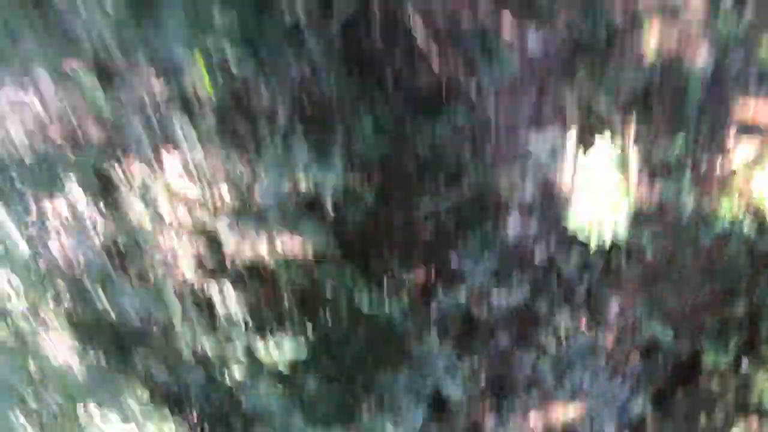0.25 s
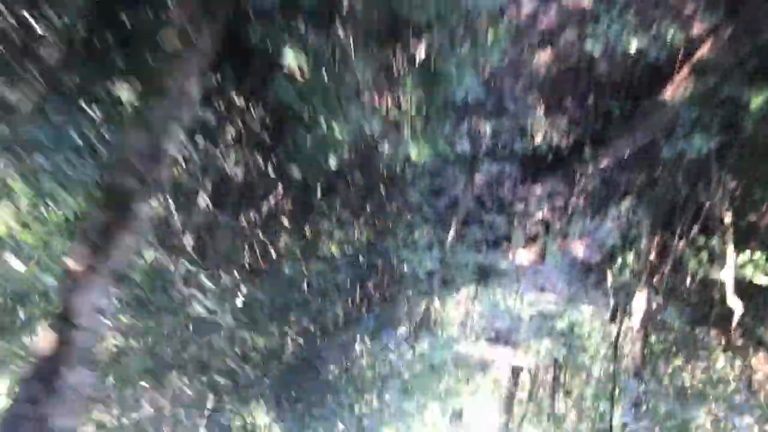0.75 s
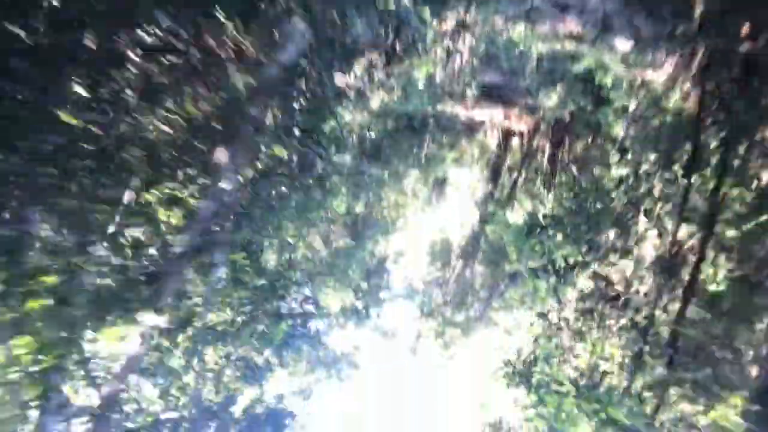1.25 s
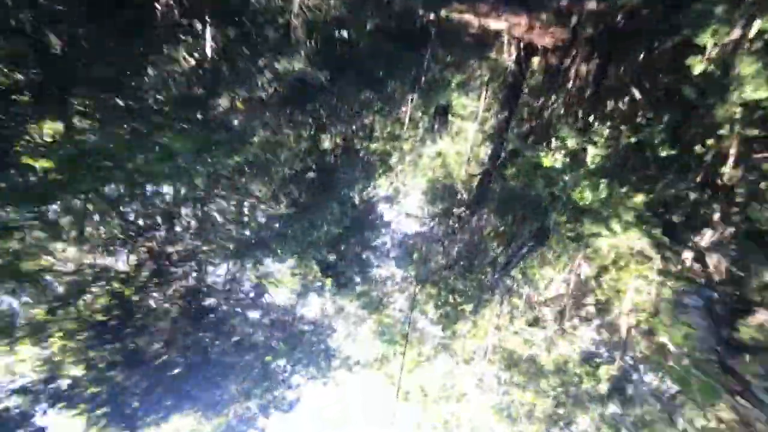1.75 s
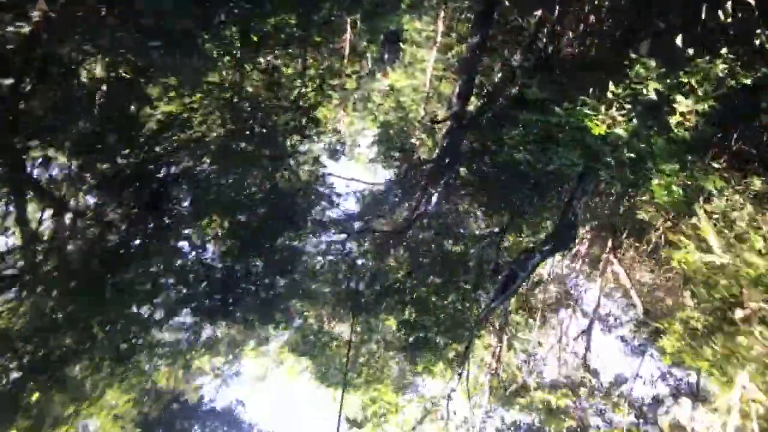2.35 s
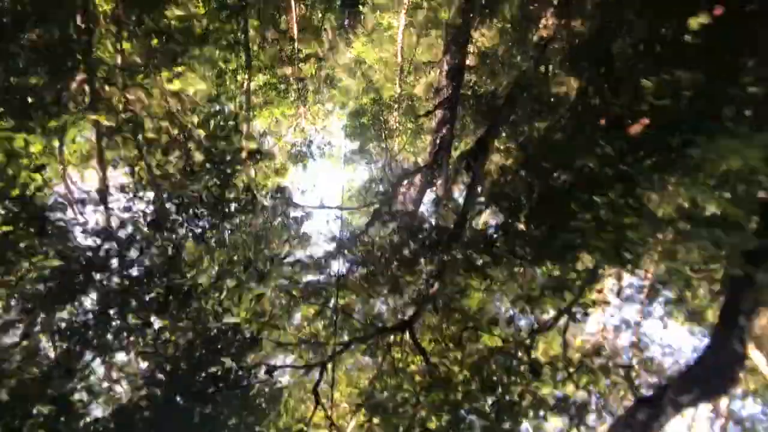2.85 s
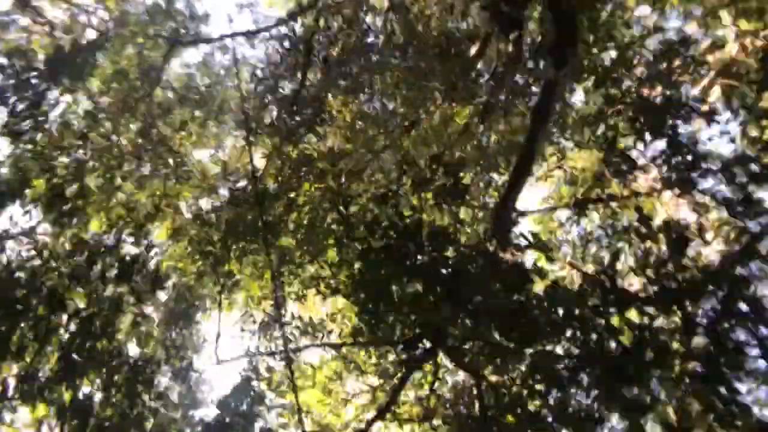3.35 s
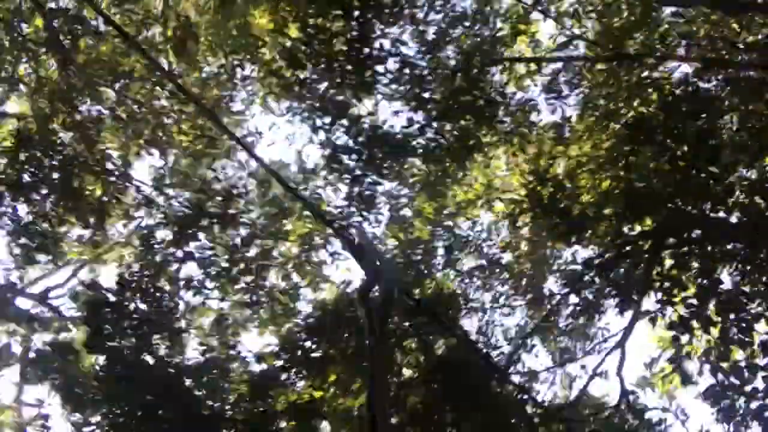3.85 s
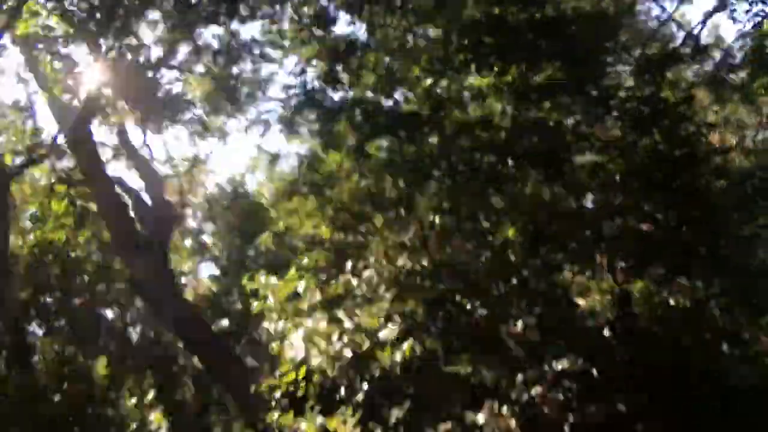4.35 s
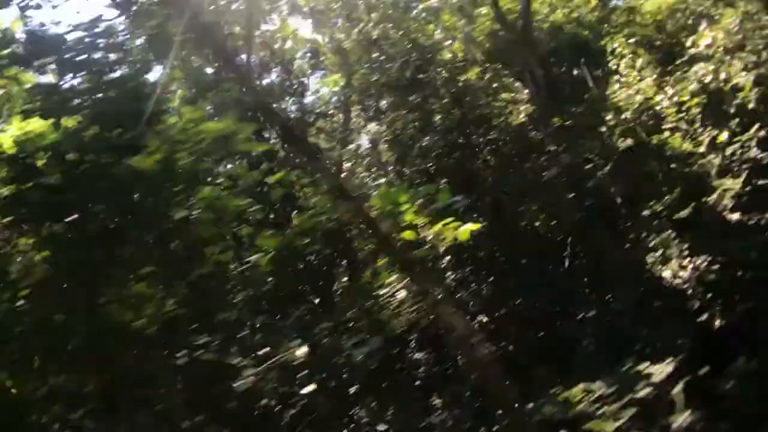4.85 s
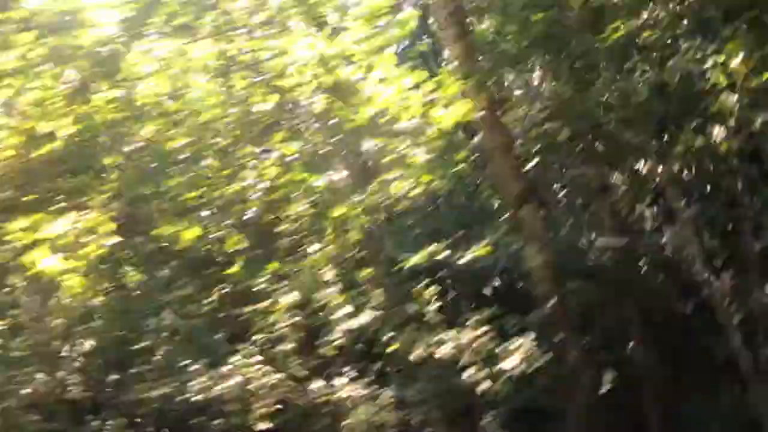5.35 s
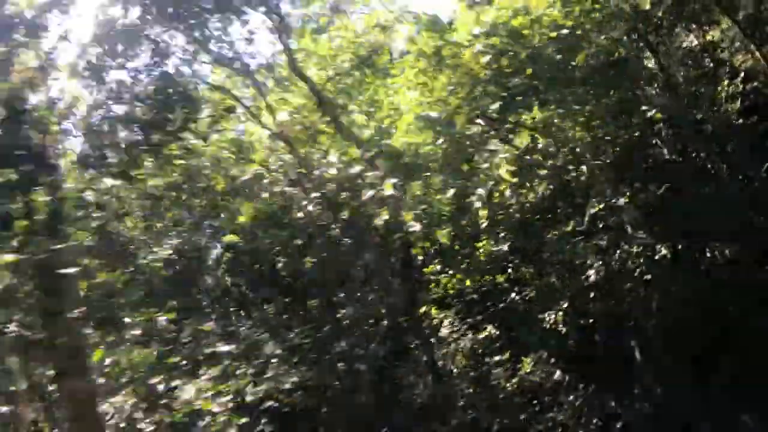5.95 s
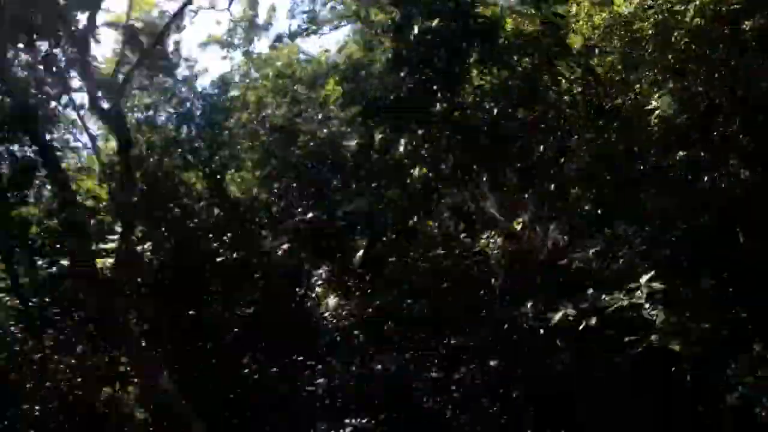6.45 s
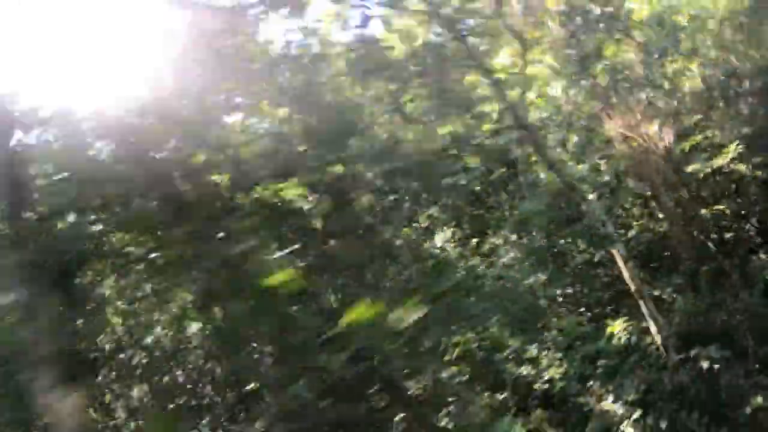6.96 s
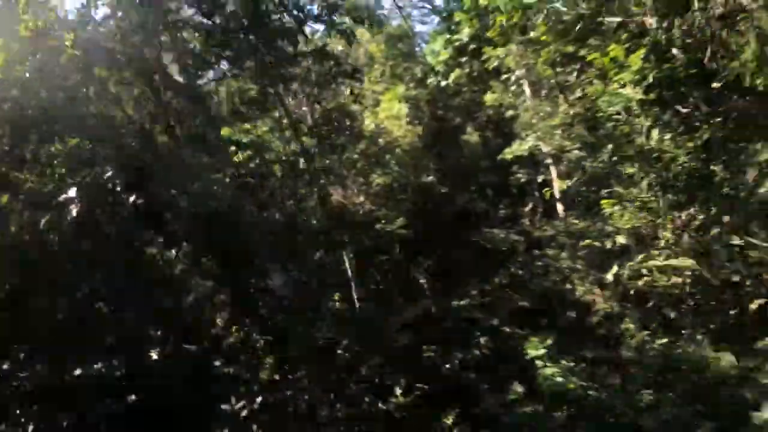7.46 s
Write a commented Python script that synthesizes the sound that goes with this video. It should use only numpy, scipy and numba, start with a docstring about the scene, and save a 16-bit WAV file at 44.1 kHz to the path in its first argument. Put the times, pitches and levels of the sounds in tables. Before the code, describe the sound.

A trolley races down a cable in a forest, bright sizzling hiss and fluttering metallic whine, after a burst of buffeting wind.

```python
"""A zipline trolley runs along a steel cable through a forest, a phone held just below it and turning about.
Wind buffets the single microphone hardest in the first second: low noise rumbles, flutters and flaps.
From the start the wheels also cross the cable's strands, a wavering stack of tones whose pitch sinks later on,
and their rough rolling hisses as noise through the resonances of cable and frame. Higher tones swell and fade
from 0.75 s, often several at once; near 4.4 s the phone swings aside, dulling the hiss near 7.5 kHz."""
import sys
import numpy as np
from scipy import signal
from scipy.io import wavfile
from scipy.ndimage import uniform_filter1d
from numba import njit

SR = 44100
rng = np.random.default_rng(int(sys.argv[2]) if len(sys.argv) > 2 else 0)


def unload_audio(sound):
    """Save the sound as a 16-bit wav file, at the path given as the first command line argument."""
    columns = np.transpose(np.atleast_2d(sound))
    # keep every value between -1 and 1, then stretch to whole-number steps
    steps = np.round(np.clip(columns, -1, 1) * 32767)
    wavfile.write(sys.argv[1], SR, steps.astype(np.int16))


N = 340011  # length in samples

# Wind on the microphone. Each row: time in seconds, rumble level in dB, flutter level in dB above the rumble.
WIND_LEVELS = [(0.0, -8.5, -14), (0.04, -18, -9), (0.19, -10.5, -15.5), (0.23, -17.5, -8), (0.36, -5, -13),
               (0.58, -13.5, -9), (0.64, -6, -16), (0.68, -17.5, -3.5), (0.75, -8.5, -10.5),
               (0.81, -37, -8), (0.9, -24.5, -14), (1.42, -37, -7), (3.41, -35, -0.5), (3.58, -38.5, 4),
               (3.8, -26.5, -9), (3.91, -34.5, -12), (4.29, -23, -7.5), (4.7, -35.5, -10.5),
               (4.85, -24, -7), (5.07, -38, -0.5), (5.24, -25.5, -8.5), (5.8, -30, -1.5), (5.84, -24.5, -5),
               (6.4, -24.5, -4), (6.46, -34.5, 1), (6.53, -14, -11.5), (6.55, -26, -5), (6.76, -17.5, -6),
               (7.17, -27.5, -4.5), (7.24, -40.5, -11), (7.65, -28, -5), (7.71, -31, -3)]
# Regions of low noise that make the rumble. Each row: centre in Hz, width of each filter pass in Hz, gain in dB.
RUMBLE_BANDS = [(35.4, 27, -11), (62.5, 50, 0), (109.5, 99, -6.5)]
# Regions that make the flutter. Each row: centre in Hz, width of each filter pass in Hz, gain in dB.
FLUTTER_BANDS = [(202, 236, 5.5), (455, 620, -7.5), (920, 750, -14.5)]
# Sharp flaps of wind. Each row: start in seconds, strength in dB before the flap's envelope.
WIND_FLAPS = [(0.135, -14), (0.162, -11), (0.261, -14), (0.412, -21), (0.514, -12), (0.543, -17),
              (0.603, -10), (0.665, -10), (0.717, -2), (0.751, -20), (0.981, -23), (3.331, -19),
              (4.155, -26), (4.185, -27), (5.714, -21), (5.787, -13), (6.021, -11.5), (6.117, -29),
              (6.21, -29), (6.237, -11), (6.651, -17), (6.889, -17), (6.974, -9), (7.052, -4), (7.171, -14)]
# Strands passing under the wheels. Each row: time in seconds, crossing rate in Hz, depth of the bounce's
# waver in Hz, how early that waver comes in seconds.
STRAND_CROSSINGS = [(0.0, 655, 7.3, 0.036), (0.85, 656.5, 5.8, 0.062), (1.12, 668, 6, 0.031),
                    (1.28, 661, 6, 0.033), (1.5, 654, 6.4, 0.0013), (1.8, 663, 18.5, 0.0),
                    (2.15, 658.4, 24.8, 0.0035), (2.55, 662.4, 21.6, 0.0065), (2.8, 658, 8.4, 0.053),
                    (3.1, 648, 13.7, 0.065), (3.33, 634, 13.7, 0.021), (3.62, 657, 10.2, -0.027),
                    (3.9, 642, 25, 0.06), (4.2, 655, 12, 0.026), (4.3, 636, 17, 0.03),
                    (4.36, 606, 35, 0.025), (4.45, 632, 28.7, 0.028), (4.55, 626, 21, 0.016),
                    (4.85, 638.4, 3.7, 0.0029), (5.15, 634, 8.4, -0.055), (5.4, 623, 9.2, 0.0074),
                    (5.68, 617, 6.2, 0.0292), (5.85, 598, 23.7, 0.018), (6.15, 606.5, 14.3, 0.04),
                    (6.3, 596, 10, 0.062), (6.7, 583, 9.8, -0.03), (6.95, 577.4, 4, 0.032),
                    (7.25, 565.5, 13, 0.025), (7.45, 551.3, 20.7, 0.0144), (7.56, 545, 29, 0.011),
                    (7.66, 558, 45, 0.017), (7.71, 562, 42, 0.0089)]
# The two lowest tones as the phone turns. Each row: time in seconds, 1st tone in dB, 2nd tone in dB.
LOW_TONE_LEVELS = [(0.0, -35, -52), (0.7, -32.5, -38.5), (0.82, -27.5, -32.5), (1.4, -22.5, -30),
                   (1.76, -21, -31), (2.3, -25, -31.5), (2.64, -29.5, -33.5), (2.72, -23.5, -33),
                   (2.98, -27, -30.5), (3.34, -34.5, -37.5), (3.5, -39.5, -40), (3.9, -40, -50),
                   (4.35, -46, -46), (4.41, -39, -35), (4.46, -44, -38), (4.52, -46, -32),
                   (4.62, -49, -40.5), (5.0, -45, -41), (5.6, -48, -37.5), (6.1, -44, -46),
                   (6.25, -47, -35), (6.66, -43.5, -41.5), (6.89, -39, -23.5), (7.19, -45, -43.5),
                   (7.29, -49, -28), (7.36, -45.5, -36), (7.45, -43, -27), (7.71, -37, -33)]
# Level of the 3rd to 6th tone outside their swells, one value each in dB.
QUIET_TONE_LEVELS = (-43, -39.5, -39.5, -37)
# Swells of the 3rd to 6th tone, one list each. Each row: start in seconds, end in seconds, level in dB.
TONE_SWELLS = [
    [(1.25, 1.75, -36), (1.95, 2.3, -39), (3.95, 4.2, -41), (4.75, 5.65, -40), (6.68, 7.22, -27.5),
     (7.38, 7.55, -32.5)],
    [(0.75, 1.55, -30.5), (2.2, 2.8, -35.5), (3.08, 3.6, -33.5), (3.9, 4.2, -34), (4.6, 5.3, -36),
     (5.33, 5.6, -28.5), (5.7, 5.92, -29), (6.18, 6.6, -32), (6.8, 7.22, -24.5), (7.38, 7.58, -21),
     (7.6, 7.71, -21.5)],
    [(0.9, 1.45, -39), (2.1, 2.8, -35), (3.0, 3.4, -31.5), (3.6, 4.2, -34), (4.95, 5.6, -33),
     (6.1, 6.55, -30.5), (6.65, 7.1, -30.5)],
    [(2.9, 4.25, -32), (4.36, 4.42, -18.5), (4.48, 4.55, -19), (5.1, 5.45, -32.5), (5.47, 5.72, -25),
     (5.87, 6.05, -24), (6.05, 6.85, -27), (6.93, 7.1, -26), (7.32, 7.4, -24), (7.61, 7.71, -31)],
]
# Resonant regions of cable and frame, one list for each part of the hiss, from low to high.
# Each row: centre in Hz, width of each filter pass in Hz, gain in dB within its part.
FRAME_PARTS = [
    [(800, 600, 0), (1150, 400, -1)],
    [(1650, 600, 0)],
    [(2550, 550, -3), (3050, 650, -4), (3670, 700, 0), (4300, 900, -1)],
    [(5500, 1200, 0), (6300, 1400, -3)],
    [(7500, 2000, 0)],
    [(8950, 1400, -3), (9750, 1200, 0)],
    [(10950, 1300, -3), (11800, 1100, 0)],
    [(12700, 1500, -2), (13400, 1300, 0), (14200, 2000, -6)],
    [(15000, 1800, -4), (15800, 1700, 0)],
]
# Rolling hiss as the phone turns, before each part's offset. Each row: time in seconds,
# 2-5 kHz roar in dB, 9-10 kHz ring in dB, 12-14 kHz sizzle in dB.
ROLLING_LEVELS = [(0.0, -29.5, -24.5, -25.5), (0.6, -31.5, -26, -24.5), (1.2, -25.5, -23.5, -21.5),
                  (1.8, -26, -24, -19.5), (2.15, -24.5, -22.5, -16), (2.35, -23, -24.5, -16.5),
                  (2.65, -27, -24.5, -16.5), (3.1, -23, -22.5, -14.5), (3.3, -26.5, -20, -18),
                  (3.7, -25, -17, -19.5), (3.93, -22.5, -15.5, -23), (4.12, -24, -21, -26.5),
                  (4.26, -21.5, -16, -23.5), (4.34, -23, -28, -25), (4.45, -24, -22, -20.5),
                  (4.62, -25, -23, -28), (5.15, -24, -24.5, -21.5), (5.5, -24, -22, -21),
                  (5.85, -20, -19, -22.5), (6.1, -20.5, -19.5, -19.5), (6.45, -21, -21, -22.5),
                  (6.7, -23, -18.5, -23.5), (6.8, -21, -23.5, -25), (7.07, -18.5, -16.5, -21.5),
                  (7.28, -19.5, -15.5, -23.5), (7.52, -15.5, -20, -19), (7.71, -20.5, -20.5, -17)]
# Hiss near 1 kHz. Each row: time in seconds, level in dB.
LOW_HISS_LEVEL = [(0.0, -37), (2.06, -29.5), (2.51, -34.5), (2.86, -34), (3.99, -53), (4.29, -44.5),
                  (4.7, -47), (6.21, -42), (6.57, -47), (6.87, -49), (7.19, -48.5), (7.71, -37)]
# Hiss in the quiet gap near 1.6 kHz. Each row: time in seconds, level in dB.
GAP_HISS_LEVEL = [(0.0, -55), (0.6, -51), (1.05, -36), (1.4, -54), (2.2, -60), (3.3, -47), (4.4, -39.5),
                  (5.1, -43.5), (6.7, -36.5), (6.95, -29), (7.3, -34), (7.71, -33)]
# Hiss at the very top, before its offset. Each row: time in seconds, level in dB.
TOP_HISS_LEVEL = [(0.0, -31), (0.6, -34), (1.4, -26.5), (1.8, -27), (2.25, -23), (2.85, -26), (3.5, -18),
                  (3.75, -23), (4.12, -29.5), (4.5, -22), (6.05, -26), (6.5, -34), (6.9, -32), (7.1, -28),
                  (7.71, -32)]

BOUNCE_S, BOUNCE_LOW_AT_S = .1463, 1.596  # one bounce of the trolley; a moment of lowest pitch if not early
WAVER_HZ = 3.0  # typical size of the irregular part of the waver
SWELL_S = .05  # time a swell takes to rise or fall
ASIDE_AT_S, ASIDE_TAKES_S, ASIDE_DB = 4.4, 0.19, -10  # the phone swings aside and shades 7.5 kHz
TOP_HZ = 15730  # the phone cuts what lies above


def undb(db):
    """Turn decibels into gain."""
    return 10 ** (np.asarray(db) / 20)


def unit(x):
    """Scale to an average strength (rms) of 1."""
    return x / np.sqrt(np.mean(x ** 2))


def columns(table):
    """Draw straight lines between a table's rows: each column becomes one value a sample."""
    s, *cols = np.transpose(table)
    return [np.interp(np.arange(N) / SR, s, c) for c in cols]


@njit
def svf(x, hz, width):
    """Let through sound near one pitch, like a simple resonance; gain 1 at the centre."""
    y, band, low = np.empty(len(x)), 0., 0.
    g, damping = np.tan(np.pi * hz / SR), width / hz
    for i in range(len(x)):
        v = (band + g * (x[i] - low)) / (1 + g * (g + damping))
        band, low = 2 * v - band, low + 2 * g * v
        y[i] = damping * v
    return y


def walk(rate):
    """Wander at random: levels held for 1 / rate seconds, smoothed twice and scaled to rms 1."""
    hold = int(SR / rate)
    steps = np.repeat(rng.standard_normal(N // hold + 1), hold)
    smooth = uniform_filter1d(uniform_filter1d(steps, hold), hold)
    return unit(smooth[:N])


def resonate(modes, flicker_db, rate):
    """Ring noise through resonances, two filter passes each, every one flickering on its own."""
    out = 0
    for hz, width, db in modes:
        hz, width = float(hz), float(width)
        once = svf(rng.standard_normal(N), hz, width)
        band = svf(once, hz, width)
        out = out + undb(db + flicker_db * walk(rate)) * band
    return unit(out)


def wind():
    """Eddies thump the microphone port; flutter above the rumble comes in short spits and a few hard flaps."""
    rumble_db, flutter_db = columns(WIND_LEVELS)
    puff, spit = walk(40), walk(130)
    rumble_gusts = undb(0.45 * puff + 0.99 * walk(16))
    rumble = unit(rumble_gusts * resonate(RUMBLE_BANDS, flicker_db=1.1, rate=35))
    air = resonate(FLUTTER_BANDS, flicker_db=1.93, rate=60)
    flutter = unit(undb(0.74 * puff + 3.0 * spit + 1.84 * walk(18)) * air)

    flap_s, flap_db = np.array(WIND_FLAPS).T
    starts = np.zeros(N)
    starts[(flap_s * SR).astype(int)] = undb(flap_db)
    t = np.arange(2048) / SR
    flap_shape = (1 - np.exp(-t / 0.0024)) * np.exp(-t / 0.004)  # quick rise, quick fade
    flaps = np.convolve(starts, flap_shape)[:N] * air
    return undb(rumble_db) * (rumble + undb(flutter_db) * flutter) + flaps


def swelling(quiet_db, swells):
    """Level in dB of one higher tone: quiet, with the power of its swells rising and falling over it."""
    t = np.arange(N) / SR
    power = undb(2 * quiet_db)  # doubled decibels turn gain into power
    for start, end, db in swells:
        swell = np.clip(np.minimum(t - start, end - t) / SWELL_S + .5, 0, 1)
        power = power + undb(2 * db) * swell ** 2
    return 10 * np.log10(power)


def strands():
    """One tone per multiple of the crossing rate; uneven strands blur the higher ones into narrow noise."""
    hz, depth, early = columns(STRAND_CROSSINGS)
    bounce_time = np.arange(N) / SR + early - BOUNCE_LOW_AT_S
    bounce = -np.cos(2 * np.pi * bounce_time / BOUNCE_S)
    wavering_hz = hz + depth * bounce + WAVER_HZ * walk(15)
    phase = 2 * np.pi * np.cumsum(wavering_hz) / SR + 0.06 * walk(70)

    levels = columns(LOW_TONE_LEVELS)
    levels += [swelling(quiet, swells) for quiet, swells in zip(QUIET_TONE_LEVELS, TONE_SWELLS)]
    upper_db = (levels[4] + levels[5]) / 2
    levels += [upper_db - db for db in (1.5, 4.5, 7.0)]  # the 7th to 9th follow the 5th and 6th, weaker
    out = 0
    for k, db in enumerate(levels):
        blur, rate = min(.07 + .08 * k, .5), 120 + 35 * k  # noisy share of power; its changes per second
        # A steady part plus a random one that shifts both strength and phase
        size = np.sqrt(1 - blur) + np.sqrt(blur / 2) * (walk(rate) + 1j * walk(rate))
        tone = np.imag(size * np.exp(1j * (k + 1) * phase))
        out = out + np.sqrt(2) * undb(db + 1.07 * walk(6)) * tone
    return out


def between(a, b, share):
    """Blend two levels in dB; share is the weight of the first."""
    return share * a + (1 - share) * b


def rolling():
    """Rough contact excites every part; the whole hiss wavers slightly and irregularly in level."""
    roar, ring, sizzle = columns(ROLLING_LEVELS)
    aside = np.clip((np.arange(N) / SR - ASIDE_AT_S) / ASIDE_TAKES_S + .5, 0, 1)
    levels = [columns(LOW_HISS_LEVEL)[0],
              columns(GAP_HISS_LEVEL)[0],
              roar - 0.6,
              between(roar, sizzle, 0.52) - 5.5 - 0.54 * aside,
              between(ring, sizzle, 0.42) - 9.5 + ASIDE_DB * aside,
              ring + 0.99,
              between(ring, sizzle, 0.38) - 0.7,
              sizzle + 1.5,
              columns(TOP_HISS_LEVEL)[0] + 3.7]
    waver_db = 0.42 * walk(11) + 0.63 * walk(45)
    hiss = 0
    for modes, db in zip(FRAME_PARTS, levels):
        hiss = hiss + undb(db) * resonate(modes, flicker_db=1.7, rate=7)
    return undb(waver_db) * hiss


def scene():
    """One microphone feeds both channels; strong gusts drive its membrane to the end of its travel."""
    gusts = .8 * np.tanh(wind() / .8)
    return np.tile(gusts + strands() + rolling(), (2, 1))


def record(dry):
    """The phone rounds the loudest peaks and cuts the top."""
    rounded = dry / (1 + (dry / .8) ** 4) ** .25
    top_cut = signal.ellip(16, .2, 90, TOP_HZ, fs=SR, output="sos")
    return signal.sosfilt(top_cut, rounded)


dry = scene()
out = record(dry)
unload_audio(out)
```